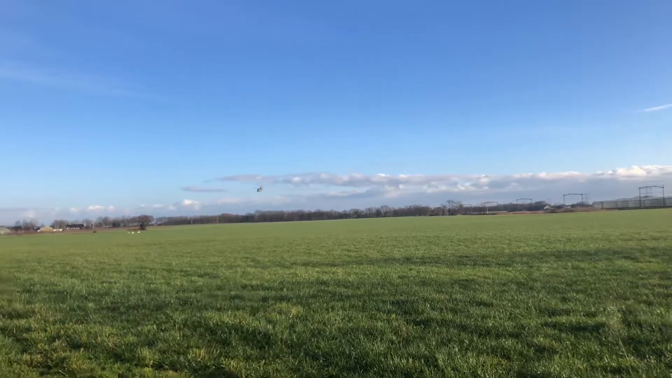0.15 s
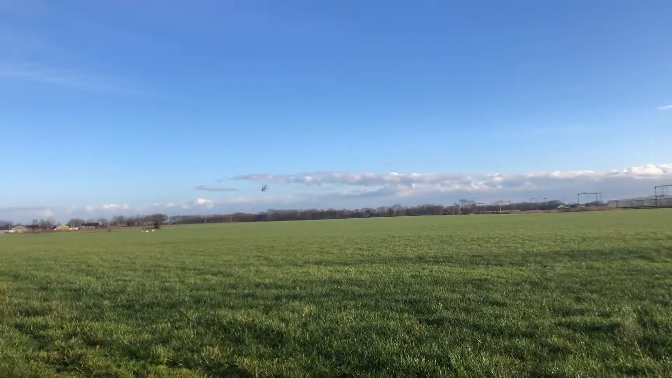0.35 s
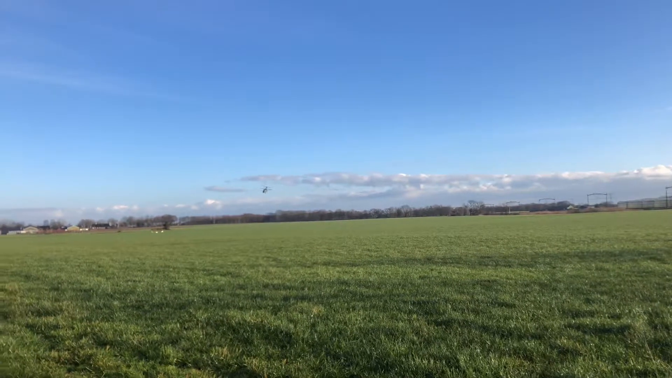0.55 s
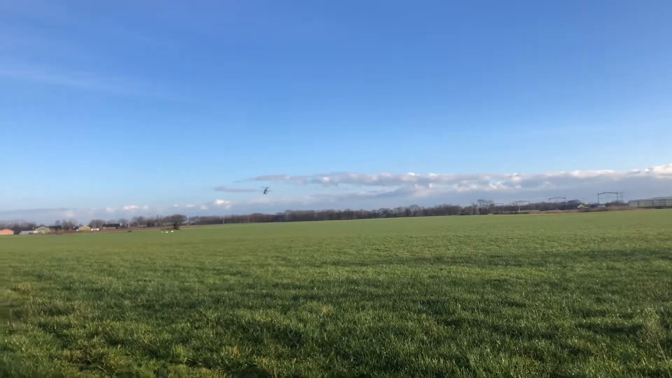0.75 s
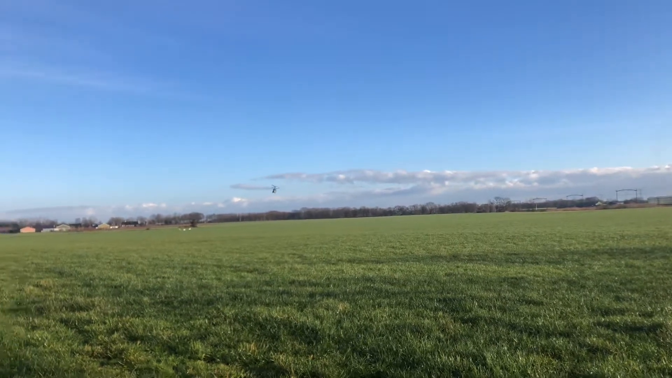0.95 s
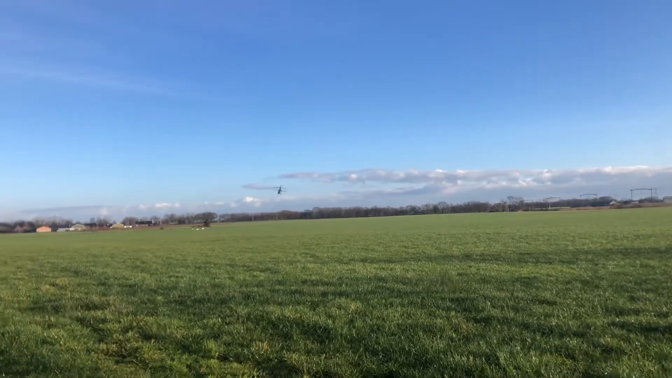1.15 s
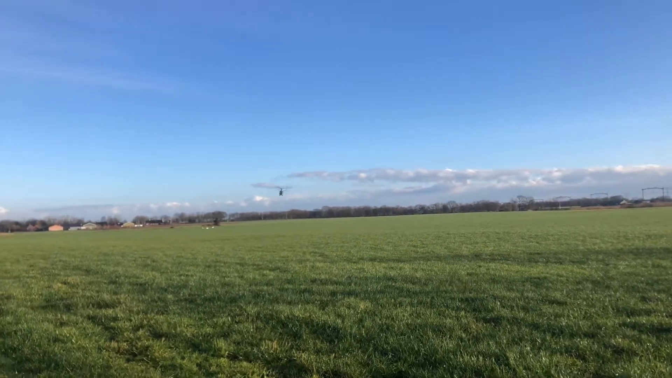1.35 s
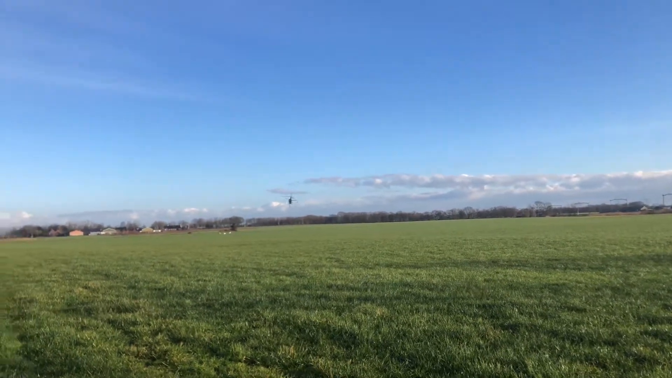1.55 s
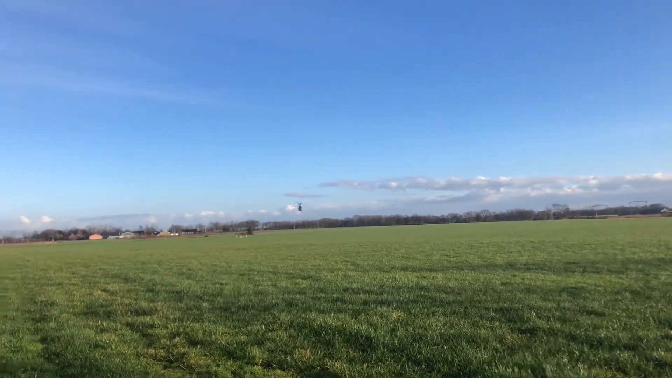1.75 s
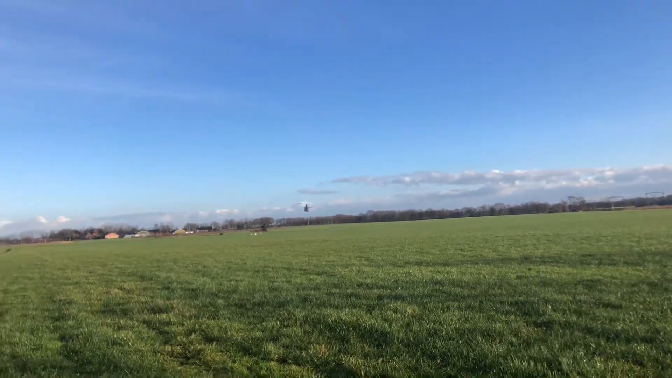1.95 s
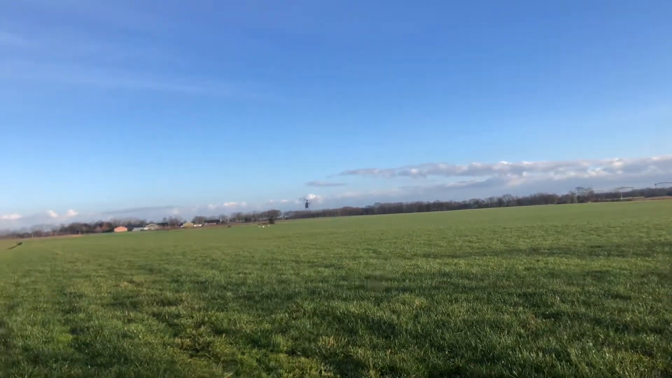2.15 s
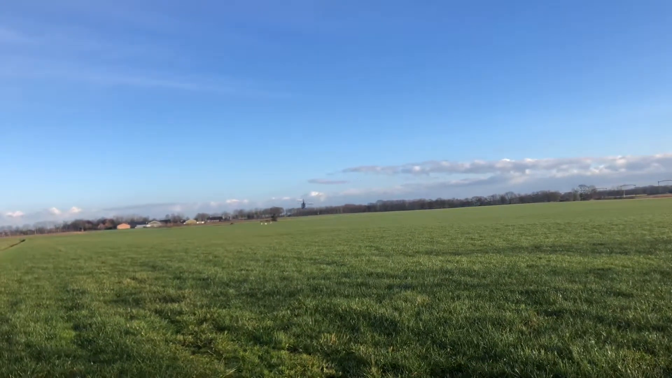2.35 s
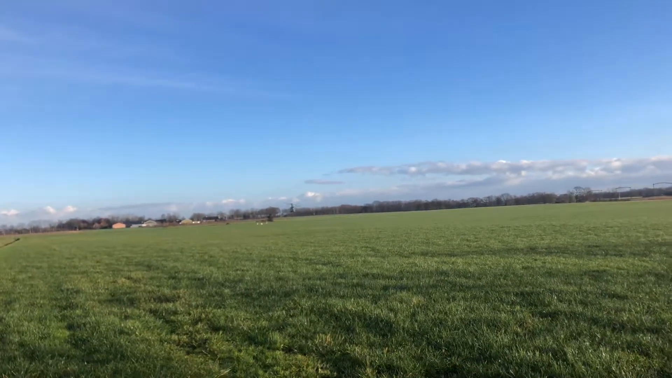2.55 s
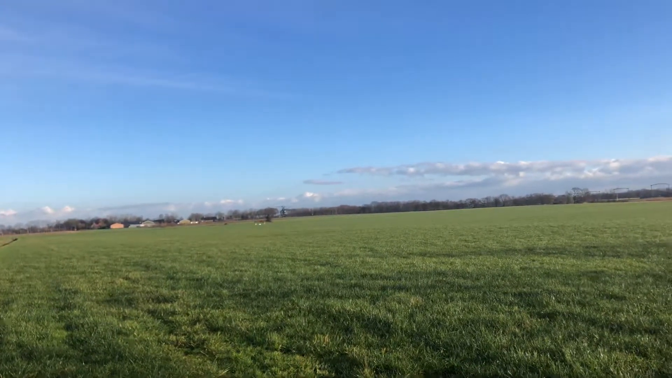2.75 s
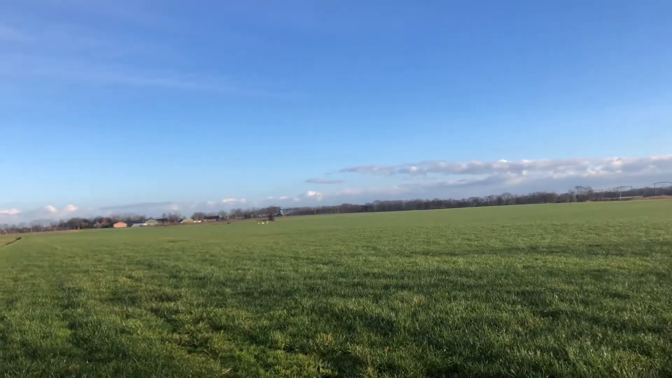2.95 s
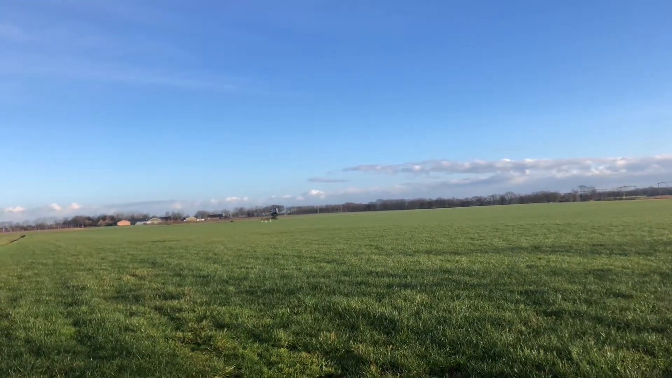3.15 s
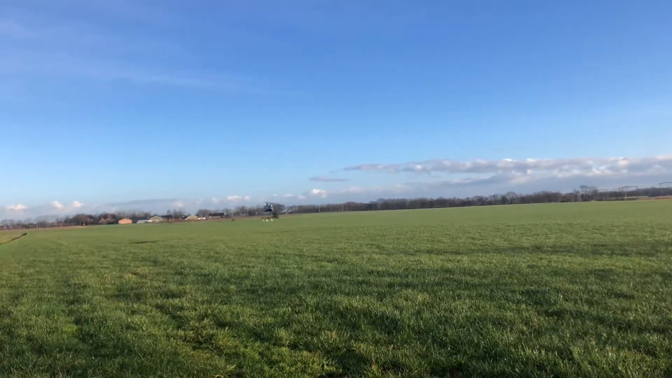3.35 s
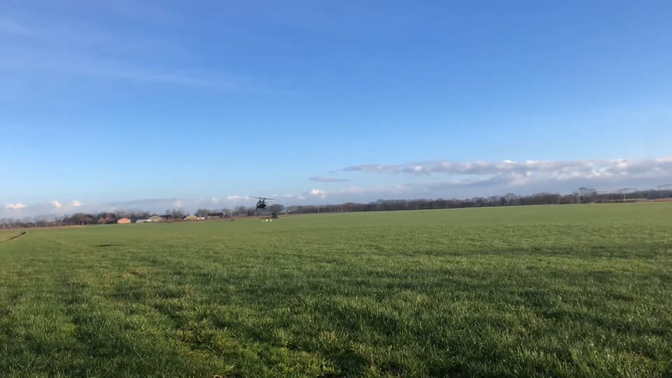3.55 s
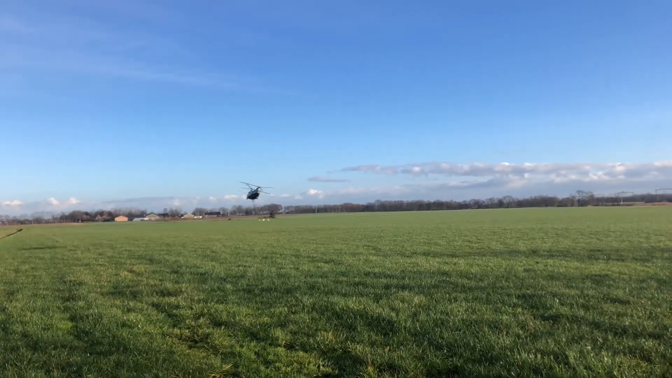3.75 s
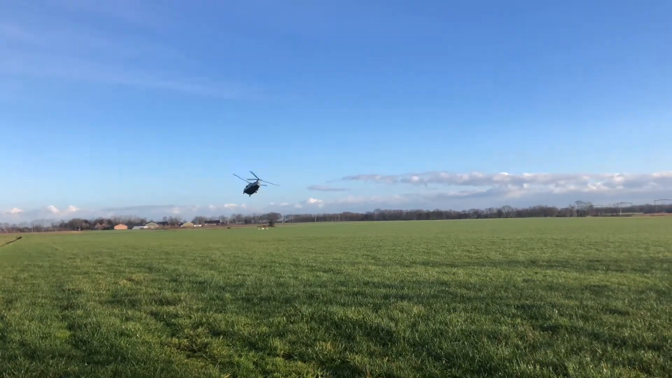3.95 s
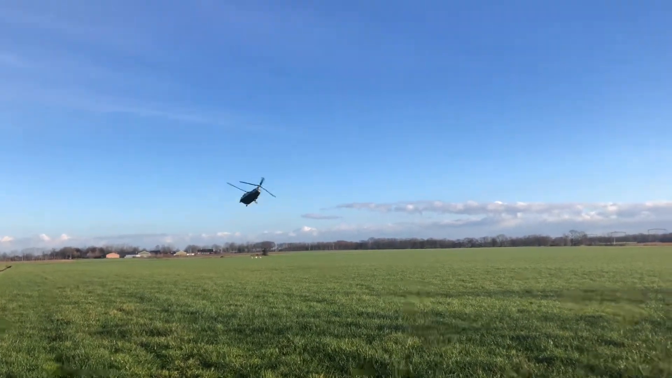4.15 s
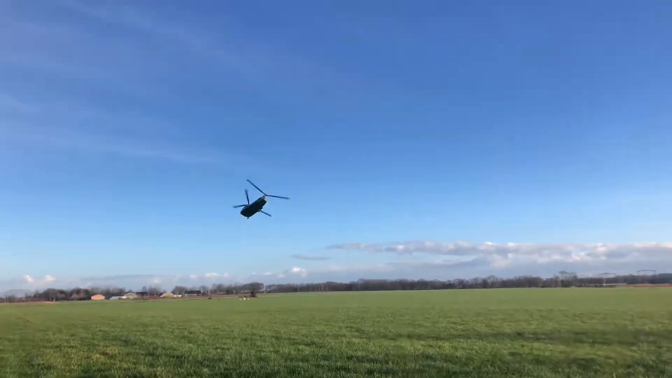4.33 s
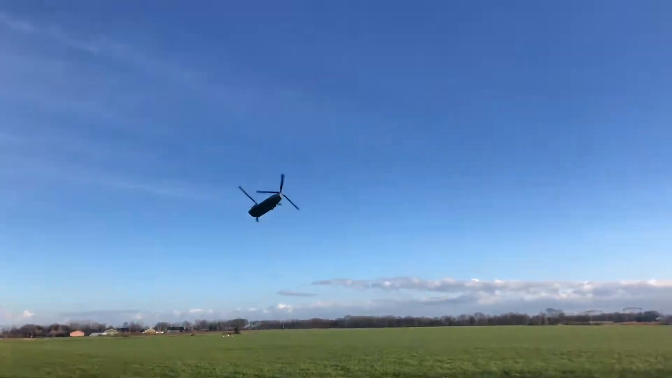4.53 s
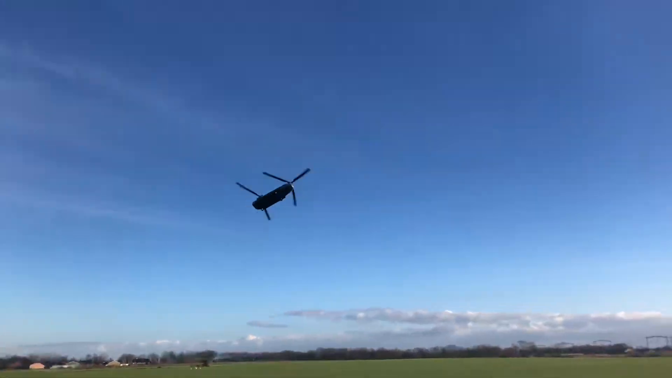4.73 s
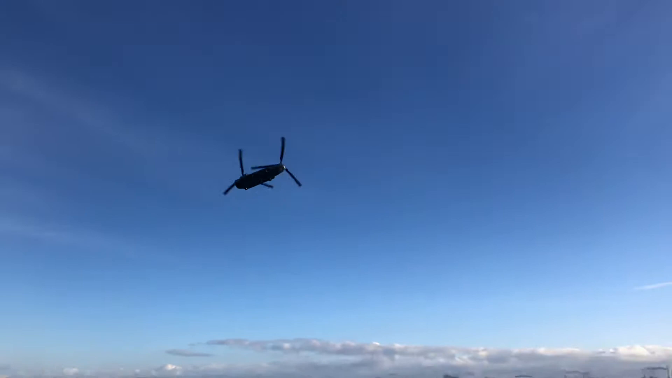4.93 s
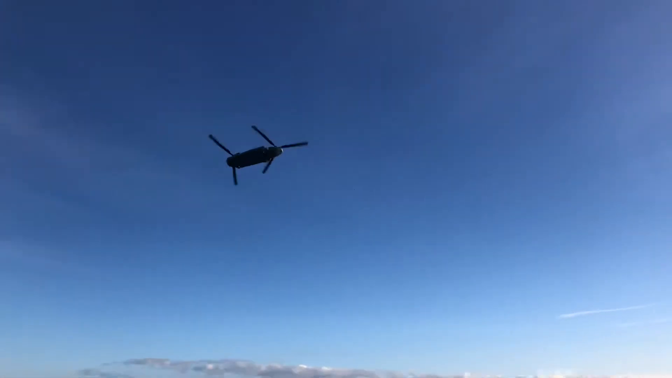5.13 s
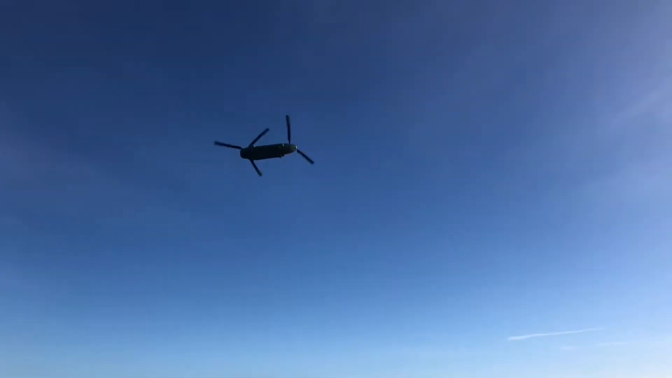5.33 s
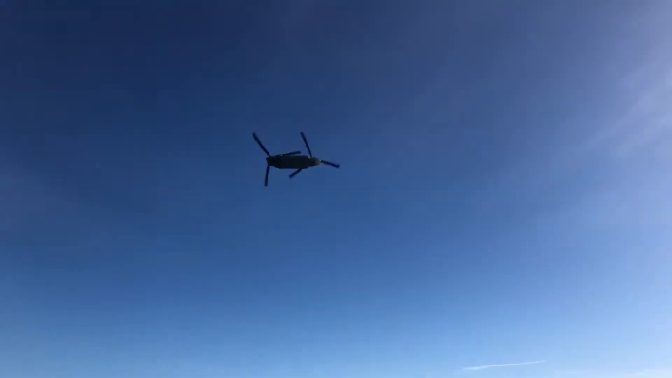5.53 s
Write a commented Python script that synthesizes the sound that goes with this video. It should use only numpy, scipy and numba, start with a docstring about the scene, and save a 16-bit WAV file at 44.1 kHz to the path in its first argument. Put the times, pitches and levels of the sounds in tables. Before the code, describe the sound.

Outdoors over open grass, a turbine-powered tandem-rotor model helicopter turns in the distance, a soft rapid thrum with faint wavering hiss. After three seconds it rushes closer, pulls up and passes overhead, blades slapping hard around five seconds, with jet roar, sizzle and a thin whistle. The slaps then ease. One low microphone, dry open air, no other sounds.

```python
"""Tandem-rotor model helicopter, turn and flyover

A large turbine model turns some 60 m out over a grass field, then flies in, pulls up and passes overhead at about 9 m.
Blade harmonics thump and drone, gated noise rushes and swishes, and pulses slap as blades cut vortices.
The turbine is shaped noise, from roar to sizzle, with a compressor whistle and faint gear tones.
At a microphone 1.5 m up, all but the sizzle and gears arrive direct and off the grass: notches sweep down in the climb."""
import sys
import numpy as np
from scipy import signal
from scipy.fft import rfft, irfft
from scipy.io import wavfile
from scipy.ndimage import uniform_filter1d, map_coordinates
from numba import njit

SR = 44100
rng = np.random.default_rng(int(sys.argv[2]) if len(sys.argv) > 2 else 0)


def output_pcm(signal):
    """Save a mono or channel-first signal as 16-bit PCM at the path in sys.argv[1].

    Samples are clipped to [-1, 1] before scaling.
    """
    pcm = np.clip(np.atleast_2d(signal).T, -1, 1) * 32767
    wavfile.write(sys.argv[1], SR, np.round(pcm).astype(np.int16))


N = 250929
TIME = np.arange(N) / SR   # s

# Flight path, distance from the microphone: t/s, r/m
DISTANCE = [(0, 54), (1.2, 62), (2.1, 41), (3.15, 37.3), (3.7, 22.7), (4.2, 14), (4.6, 10.35), (5.1, 8.6),
            (5.69, 11.4)]
# Flight path, angle above the horizon: t/s, elevation/degrees
ELEVATION = [(0, 1.75), (.25, 1.78), (.5, 2.08), (1.1, 1.93), (2.1, 1.32), (3.05, 1.05), (3.3, 1.27),
             (3.5, 1.85), (3.7, 2.9), (4, 5.25), (4.2, 7.3), (4.5, 11.7), (4.95, 20.3), (5.5, 26.5),
             (5.69, 26.7)]
# Compressor whistle as heard, Doppler shift included; it sets the pace of the whole drive: t/s, f/Hz
WHISTLE_PITCH = [(0, 10014), (0.4, 10091), (0.8, 10143), (1.25, 10180), (1.7, 10242), (2.2, 10197),
                 (2.8, 10162), (3.3, 10183), (3.65, 10195), (4, 10153), (4.25, 10126), (4.5, 10061),
                 (5, 9927), (5.35, 9834), (5.69, 9762)]
# Harmonics of the blade loading: multiple of the blade rate, relative level/dB
THUMP_HARMONICS = [(1, -6), (2, 2), (3, -0.5)]
DRONE_HARMONICS = [(3, 1), (4, -7), (5, -10), (6, -4), (7, 1), (8, -5), (9, -5), (10, -9), (11, -4),
                   (12, -3), (13, -4), (14, -5), (15, -9), (16, -10), (17, -7), (18, -9), (19, -15),
                   (20, -17), (21, -19)]
# Gear meshes: multiple of the blade rate, relative level/dB
GEAR_MESHES = [(26.69, -1), (30.94, -3), (39.96, -3), (88.8, -15.5), (111.2, -11.5)]
# Vortex crossings within one blade pass: share of the pass, relative level/dB
CROSSINGS = [(0, 0), (.47, -13), (.78, -12)]
# Colours of the rotor noise: f/Hz, relative density/dB per Hz
RUSH_SPECTRUM = [(20, -48), (38, -69), (55, -25), (110, -9), (200, -0.5), (290, 5), (420, 3), (530, 5.5),
                 (620, -7.5), (900, -34)]
WASH_SPECTRUM = [(400, -41), (560, -12), (700, 4.5), (900, 5.5), (1100, -8), (1500, -42)]
SWISH_SPECTRUM = [(650, -29), (900, -4.5), (1100, 0), (1350, 5), (1550, 1), (1800, -14), (2300, -18),
                  (2800, -19), (4500, -48)]
# Colours of the turbine noise: f/Hz, relative density/dB per Hz
ROAR_SPECTRUM = [(1300, -5.5), (2000, -1.5), (2450, 2), (3000, -4), (3700, -4.5), (5000, -11), (5700, -16),
                 (6500, -43)]
HISS_SPECTRUM = [(3500, -1.5), (4300, 3.5), (5400, 1.5), (6100, 2.5), (6900, 2), (8200, 0), (9500, -5),
                 (11500, -7), (15000, -43)]
SIZZLE_SPECTRUM = [(6000, -26), (9000, -4.5), (11500, -3.5), (13000, -4.5), (15500, -3.5), (18000, -7.5)]
# Swish, following the load on the blades, before its fixed offset: t/s, level/dB
SWISH_LEVEL = [(0.0, -31), (0.17, -32), (1.06, -37), (3.06, -36), (3.55, -28.5), (3.58, -25), (4.15, -23.5),
               (4.56, -19), (4.82, -18.5), (4.96, -16), (5.29, -20.5), (5.69, -24.5)]
# Treble, wavering on its way over the field, before the hiss and sizzle offsets: t/s, level/dB
TREBLE_LEVEL = [(0.0, -48.5), (0.13, -50), (0.4, -48), (0.54, -51.5), (0.6, -47.5), (1.38, -59),
                (1.96, -46.5), (2.16, -53), (3.12, -47), (3.34, -42.5), (3.49, -42.5), (3.56, -41),
                (4.52, -34.5), (5.64, -36), (5.69, -37)]
# Whistle, beamed from the intake and bent by the air, before its slow throb: t/s, level/dB
WHISTLE_LEVEL = [(0, -51), (.35, -61), (.72, -55), (1.8, -65), (2.3, -56.5), (3.4, -49), (3.65, -39),
                 (4.2, -33.5), (4.7, -33), (5.3, -31.5), (5.69, -39)]

WHISTLE_PER_BLADE = 136.4   # whistle cycles per blade pass
HARDEST_SLAP_S = 4.9735
REFERENCE_M = 9   # distance at which the fixed levels hold, about the closest point
MIC_HEIGHT_M, SOUND_M_PER_S = 1.5, 343


def rotor_thump(blades):
    """Blade loading radiates in the plane of the rotors, so it dips as their underside faces the listener."""
    cruise_db, underside_dip_db = -12, 11
    level_db = at_distance(-26.5, loss_db=3.17) + cruise_db * cruising()
    level_db -= underside_dip_db * bell(centre_s=5.09, width_s=0.15)
    thump = partials(blades, THUMP_HARMONICS, waver_db=2.0, wander=0.37)
    return at_level(over_grass(thump, blur=0), level_db)


def rotor_drone(blades):
    """Higher harmonics of the blade loading, beamed downwards."""
    drone = partials(blades, DRONE_HARMONICS, waver_db=2.4, wander=0.5)
    return at_level(over_grass(drone, bass_share=1.0, treble_share=0.077, blur=0), drone_level())


def wake_slaps(blades):
    """Blades cutting tip vortices: direct pulses and their ground echo."""
    slap_db = slap_level()
    pulses = harden(slap_pulses(blades), slap_db)
    return at_level(over_grass(pulses, bass_share=0.7, treble_share=0.7, blur=0.008), slap_db)


def slap_pulses(blades, spread_db=3.9, ring_hz=1250, low_hz=720, bright_hz=1300, top_hz=3100):
    """A sharp pressure pulse for each vortex crossing; the tones around ring_hz arrive late."""
    clicks = np.zeros(N)
    for share, db in CROSSINGS:
        passes = np.floor(blades - share + 0.002 * drift(12))   # slightly uneven timing
        at = np.flatnonzero(np.diff(passes))
        clicks[at] -= from_db(db + rng.uniform(-spread_db, spread_db, len(at)))
    pulse = signal.sosfilt(signal.butter(2, low_hz, "high", fs=SR, output="sos"), clicks + 1e-18)
    pulse = signal.sosfilt(signal.butter(1, bright_hz, fs=SR, output="sos"), pulse)
    pulse = signal.sosfilt(signal.butter(6, top_hz, fs=SR, output="sos"), pulse)
    pulse = pulse + 0.8 * signal.lfilter(*signal.iirpeak(ring_hz, 2, fs=SR), pulse)
    poles = signal.iirpeak(ring_hz, 0.8, fs=SR)[1]
    return signal.lfilter(poles[::-1], poles, pulse)   # an allpass holds back the middle register


def harden(pulses, slap_db, full_db=-18, dull_hz=1800):
    """A gentle slap is dull; only a hard one gets its full crack."""
    dull = signal.sosfiltfilt(signal.butter(2, dull_hz, fs=SR, output="sos"), pulses)
    crack = np.clip(from_db(slap_db - full_db), 0.3, 1)
    return dull + crack * (pulses - dull)


def wake_rush(blades):
    """Low turbulence of the wake, swelling gently with each blade."""
    level_db = at_distance(-26.5, loss_db=4.75) - 4.5 * tail_on()
    rush = noise(RUSH_SPECTRUM) * blade_gate(blades, depth=0.26, sharpness=1.3)
    return at_level(over_grass(rush), level_db)


def wash_and_swish(blades):
    """Downwash turbulence and blade-tip noise, less what the tips give to slaps and drone."""
    wash_db = at_distance(-21, loss_db=12.3) + beamed_down(1.5) + 15.5 * tail_on()
    wash = noise(WASH_SPECTRUM) * blade_gate(blades, depth=1.0, sharpness=8.9)
    wash = at_level(over_grass(wash, bass_share=0.23), wash_db)

    swish_db = in_time(SWISH_LEVEL) + 0.5
    swish = noise(SWISH_SPECTRUM) * blade_gate(blades, depth=0.19, sharpness=3.3)
    swish = at_level(over_grass(swish, bass_share=0.58, treble_share=0.34), swish_db)

    slap_power = from_db(slap_level() - swish_db) ** 2
    drone_power = from_db(drone_level() - swish_db) ** 2
    pulsed = uniform_filter1d(slap_power + 0.3 * drone_power, size=6001)
    return np.sqrt(np.clip(1 - pulsed, 0.1, 1)) * (wash + swish)


def jet_roar():
    """Lower jet noise; tail-on and head-on it is one small source, so its ground notches are deeper."""
    level_db = at_distance(-26, loss_db=5.45)
    head_on = 0.5 * bell(centre_s=3.85, width_s=0.4)
    roar = over_grass(noise(ROAR_SPECTRUM), treble_share=0.65, blur=0.015, focus=jet_focus() + head_on)
    slap_power = from_db(slap_level() - level_db) ** 2
    left = np.sqrt(np.clip(1 - 0.13 * slap_power, 0.35, 1))   # slaps take over this register
    return left * at_level(roar, level_db)


def jet_treble():
    """Hiss and sizzle of the jet, wavering in gusty air; distance dulls the sizzle most."""
    hiss_offset_db, sizzle_offset_db, air_loss_db_per_m = 4.5, 5, 0.33
    treble_db = in_time(TREBLE_LEVEL)
    hiss = over_grass(noise(HISS_SPECTRUM), bass_share=0.41, treble_share=0.033, grass_hz=3930,
                      blur=0.027, focus=jet_focus())
    hiss = at_level(low_sky_hollow(hiss), treble_db + hiss_offset_db)
    air_loss_db = air_loss_db_per_m * (in_time(DISTANCE) - REFERENCE_M)
    sizzle = at_level(noise(SIZZLE_SPECTRUM), treble_db + sizzle_offset_db - air_loss_db)
    shimmer = from_db(0.66 * drift(11.5))
    return shimmer * (hiss + sizzle)


def low_sky_hollow(x, hollow_hz=6080, hollow_q=6, depth=0.68):
    """Low over the horizon the hiss has a narrow hollow, which fills as the helicopter rises."""
    hollow = np.interp(echo_lag_ms(), [0.34, 2.04], [depth, 0])
    return x - hollow * signal.lfilter(*signal.iirpeak(hollow_hz, hollow_q, fs=SR), x)


def compressor_whistle(blades):
    """One tone locked to the drive, throbbing slowly in level."""
    throb_hz, throb_db, throb_peak_s = 4.5, 3.5, 3.66
    throb = throb_db * np.cos(2 * np.pi * throb_hz * (TIME - throb_peak_s))
    whistle = partials(blades, [(WHISTLE_PER_BLADE, 0)], waver_db=1.5, wander=0.4)
    return at_level(over_grass(whistle, treble_share=0.6, blur=0.005), in_time(WHISTLE_LEVEL) + throb)


def gear_song(blades):
    """Faint tones of the meshing teeth, weakest from behind."""
    level_db = at_distance(-42, loss_db=2.65) - 17 * tail_on()
    return from_db(level_db) * partials(blades, GEAR_MESHES, waver_db=2.5, wander=0.91)


def slap_level():
    """Slaps in dB: they build as the pull-up drives blades into the other rotor's wake, bite, then die away."""
    cruise_db, pull_end_s, release_db_per_s = -9.5, 5.01, 16.5
    bite = 2.5 * bell(HARDEST_SLAP_S, width_s=0.046)
    release = release_db_per_s * np.maximum(TIME - pull_end_s, 0)
    return at_distance(-18, loss_db=7.7) + cruise_db * cruising() + bite - release


def drone_level():
    """Drone in dB, from distance and downward beaming."""
    return at_distance(-19, loss_db=14.4) + beamed_down(5.5)


def jet_focus():
    """How far the jet acts as one small source when seen from behind."""
    return 0.31 * tail_on()


def cruising(pull_start_s=3.39, attack_s=0.4):
    """1 in level flight, falling towards 0 as the pull-up loads the blades."""
    return np.exp(-np.maximum(TIME - pull_start_s, 0) / attack_s)


def tail_on(turn_start_s=0.36, turn_end_s=2.24):
    """1 while the tail faces the listener, 0 once the far turn is done."""
    return np.interp(TIME, [turn_start_s, turn_end_s], [1, 0])


def at_distance(reference_db, loss_db):
    """Level in dB along the flight path; loss_db is lost per doubling of distance."""
    return reference_db - loss_db * np.log2(np.maximum(in_time(DISTANCE), 1) / REFERENCE_M)


def beamed_down(db_per_doubling):
    """Level in dB of a sound sent downwards, by doublings of elevation; 0 at the highest angle."""
    degrees = in_time(ELEVATION)
    return db_per_doubling * np.log2(degrees / degrees.max())


def partials(turns, orders, waver_db, wander):
    """Multiples of a rotation, each wavering in level and phase in the moving air."""
    total = np.zeros(N)
    for order, db in orders:
        gain = from_db(db + waver_db * drift(4.7))
        phase = 2 * np.pi * (order * turns + rng.random()) + wander * drift(1.88)
        total += gain * np.sin(phase)
    return total * np.sqrt(2)


def blade_gate(blades, depth, sharpness):
    """Noise swells each time a blade swings towards the listener."""
    return 1 + depth * ((1 + np.cos(2 * np.pi * blades)) / 2) ** sharpness


def noise(spectrum):
    """Turbulence with a given colour, unit power."""
    hz, db = np.transpose(spectrum)
    bins_hz = np.arange(N + 1) * SR / (2 * N)
    colour = np.interp(np.log(bins_hz + 1), np.log(hz), db)
    return rms_one(irfft(rfft(rng.standard_normal(2 * N)) * from_db(colour))[:N])


def over_grass(x, bass_share=0.67, treble_share=0.17, grass_hz=2200, blur=0.05, turn_hz_per_ms=1650, focus=0):
    """Direct sound plus ground reflection; the flatter the angle, the lower soft ground starts to invert it."""
    lag_ms = echo_lag_ms()
    corner = np.tan(np.pi * np.minimum(turn_hz_per_ms * lag_ms, SR / 4) / SR)
    bounced = turn_phase(x, (1 - corner) / (1 + corner))
    bass = signal.sosfiltfilt(signal.butter(1, grass_hz, fs=SR, output="sos"), bounced)
    softened = bass_share * bass + treble_share * (bounced - bass)
    bounced = softened + focus * (bounced - softened)
    lag_ms = lag_ms * (1 + blur * drift(19))   # a long body has many paths, which smear the high notches
    return x + map_coordinates(bounced, [np.arange(N) - lag_ms * SR / 1000], order=3)


@njit
def turn_phase(x, pole):
    """A moving allpass: bass keeps its sign, treble is inverted."""
    y = np.zeros(len(x))
    for i in range(1, len(x)):
        y[i] = pole[i] * (y[i - 1] - x[i]) + x[i - 1]
    return y


def echo_lag_ms():
    """Extra travel time of the ground reflection, from elevation and microphone height."""
    extra_m = 2 * MIC_HEIGHT_M * np.sin(np.radians(in_time(ELEVATION)))
    return 1000 * extra_m / SOUND_M_PER_S


def drift(rate_hz):
    """Slow chance with spread 1, drawn at every 40th sample and interpolated."""
    pole = np.exp(-2 * np.pi * rate_hz * 40 / SR)
    steps = rng.standard_normal(N // 40 + 2002)
    slow = signal.lfilter([1], [1, -2 * pole, pole * pole], steps)[2000:]   # skip the settling
    return np.interp(np.arange(N) / 40, np.arange(len(slow)), rms_one(slow))


def at_level(x, db):
    """Even out the slow loudness of a sound, then give it a level."""
    return from_db(db) * x / np.sqrt(uniform_filter1d(x ** 2, size=8001) + 1e-12)


def in_time(rows):
    """A two-column curve at every sample."""
    s, values = np.transpose(rows)
    return np.interp(TIME, s, values)


def bell(centre_s, width_s):
    """A smooth bump of height 1."""
    return np.exp(-((TIME - centre_s) / width_s) ** 2)


def from_db(db):
    """Decibels to gain."""
    return 10 ** (np.asarray(db) / 20)


def rms_one(x):
    """Scale to unit power."""
    return x / np.sqrt(np.mean(x ** 2) + 1e-20)


def scene():
    """Rotors, whistle and gears run on one drive; the jet noise joins them."""
    blades = np.cumsum(in_time(WHISTLE_PITCH) / WHISTLE_PER_BLADE) / SR
    blades = blades - np.interp(HARDEST_SLAP_S, TIME, blades)   # blade passes, 0 at the hardest slap
    rotors = rotor_thump(blades) + rotor_drone(blades) + wake_slaps(blades)
    rotors = rotors + wake_rush(blades) + wash_and_swish(blades)
    turbine = jet_roar() + jet_treble() + compressor_whistle(blades) + gear_song(blades)
    return (rotors + turbine)[None]


def record(dry):
    """The deep bass is rolled off, the highest peaks are rounded and the top is cut steeply."""
    low_cut_hz, top_cut_hz, ceiling = 48, 15800, 1.2
    dry = signal.sosfilt(signal.butter(4, low_cut_hz, "high", fs=SR, output="sos"), dry)
    rounded = ceiling * np.tanh(dry / ceiling)
    return signal.sosfilt(signal.ellip(12, 0.1, 90, top_cut_hz, fs=SR, output="sos"), rounded)


dry = scene()
out = record(dry)
output_pcm(out)
```